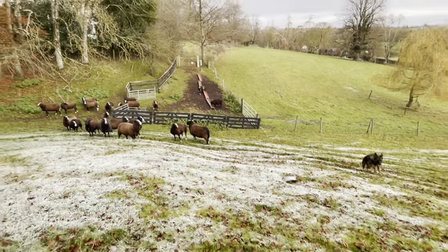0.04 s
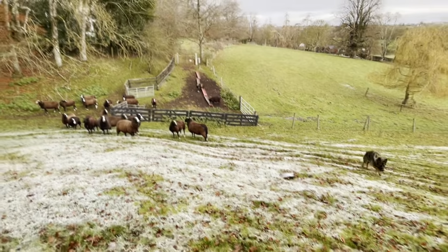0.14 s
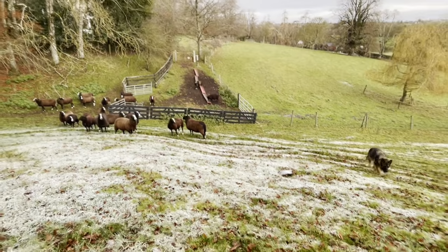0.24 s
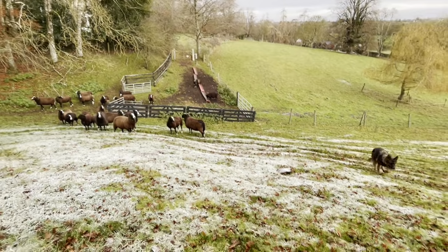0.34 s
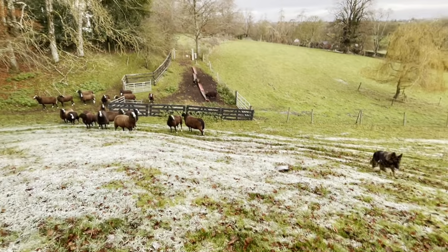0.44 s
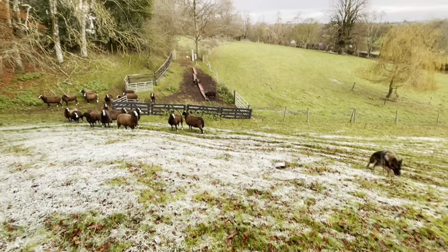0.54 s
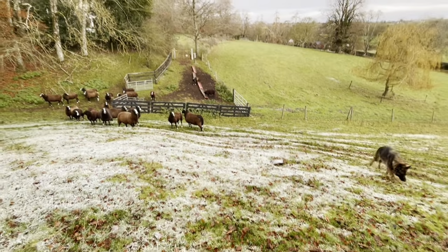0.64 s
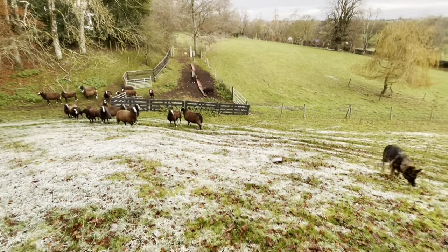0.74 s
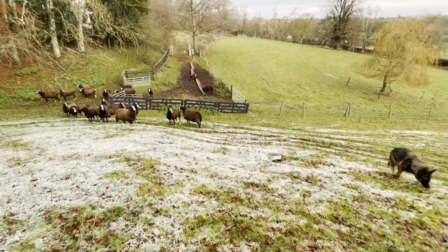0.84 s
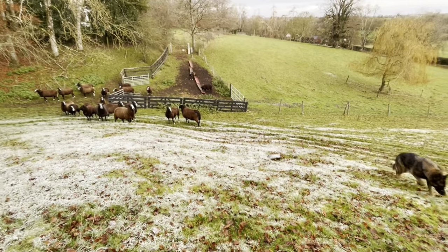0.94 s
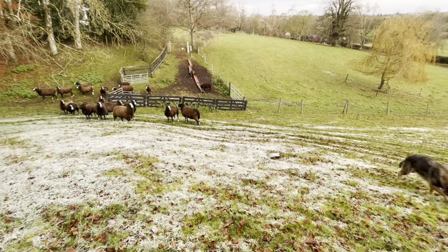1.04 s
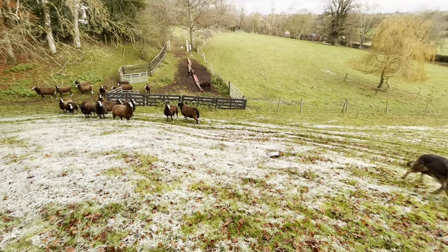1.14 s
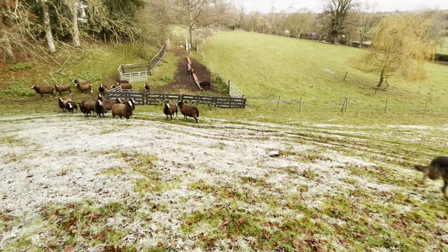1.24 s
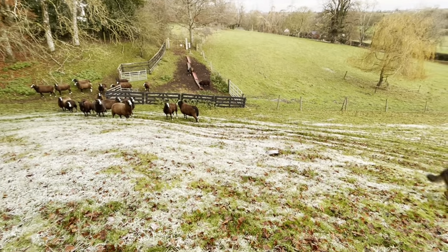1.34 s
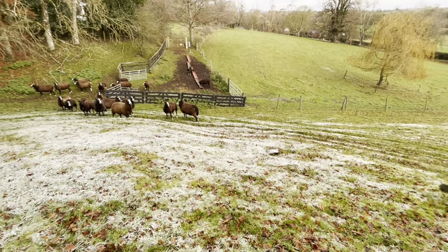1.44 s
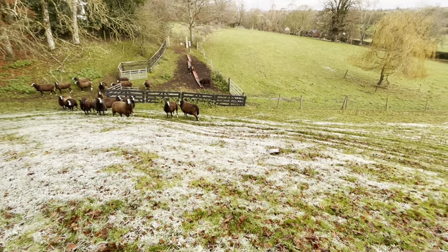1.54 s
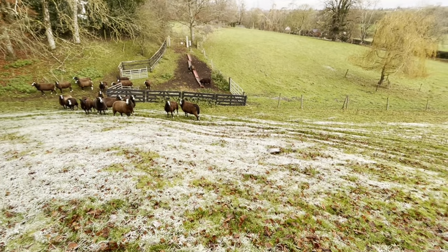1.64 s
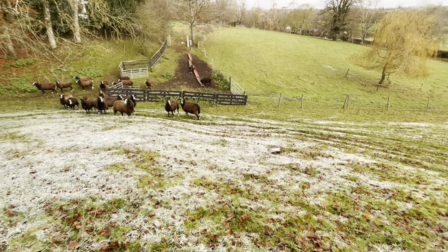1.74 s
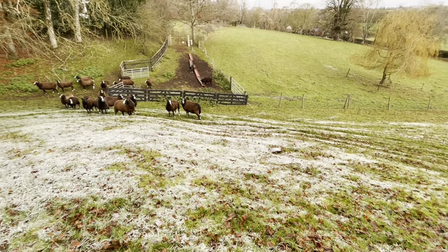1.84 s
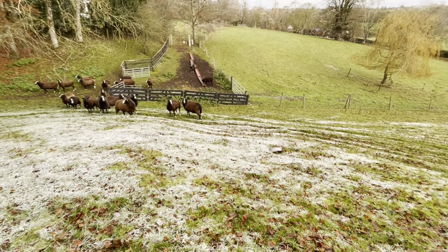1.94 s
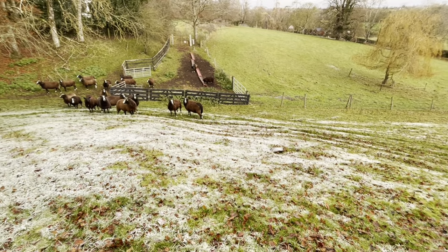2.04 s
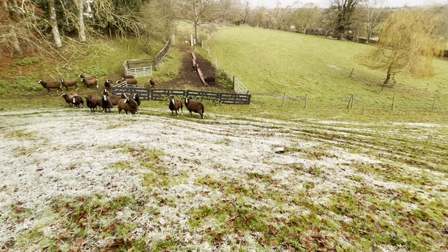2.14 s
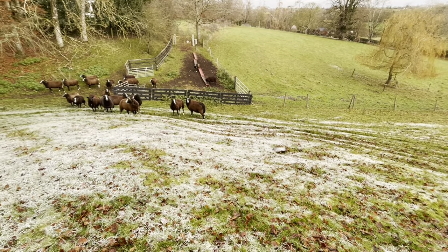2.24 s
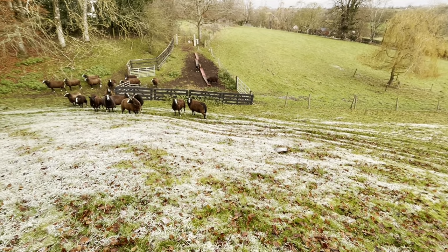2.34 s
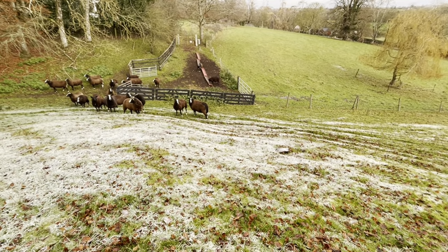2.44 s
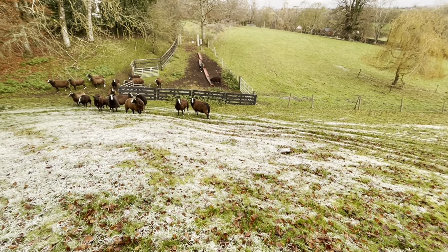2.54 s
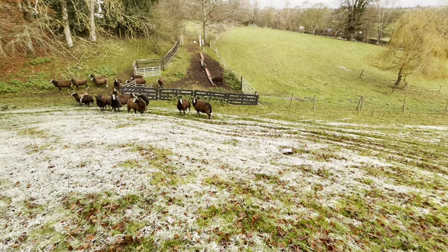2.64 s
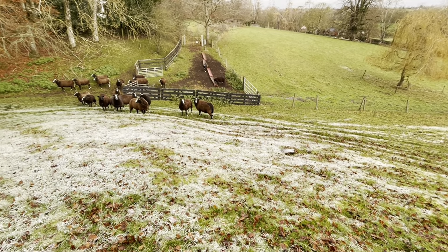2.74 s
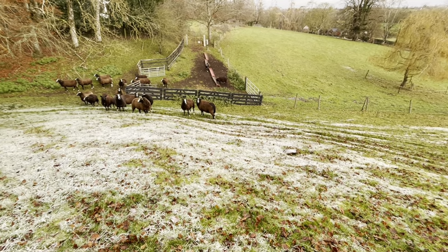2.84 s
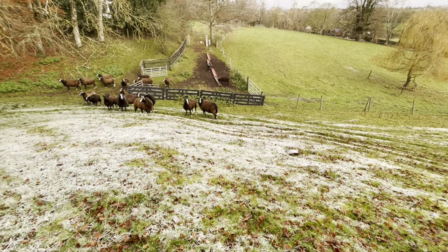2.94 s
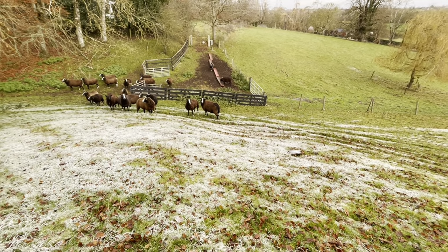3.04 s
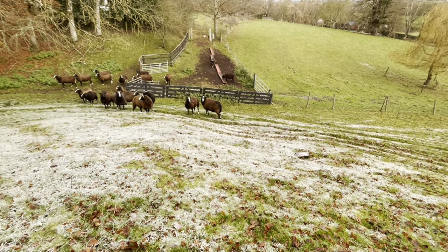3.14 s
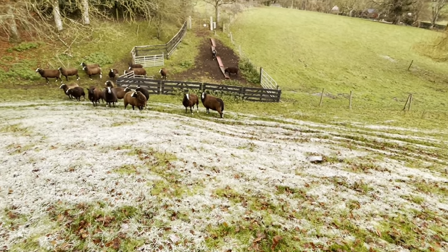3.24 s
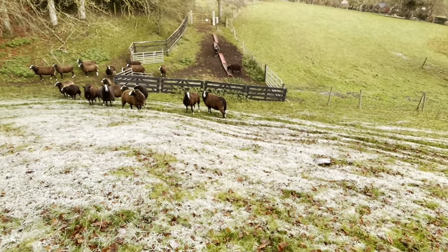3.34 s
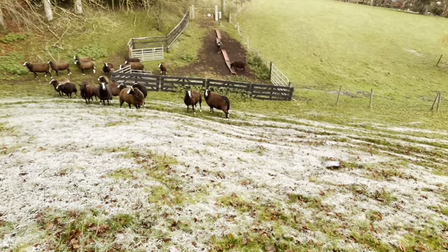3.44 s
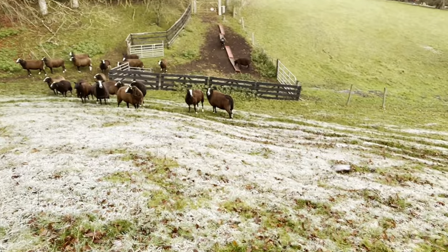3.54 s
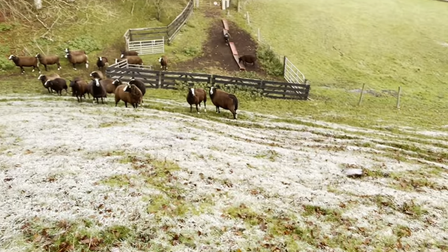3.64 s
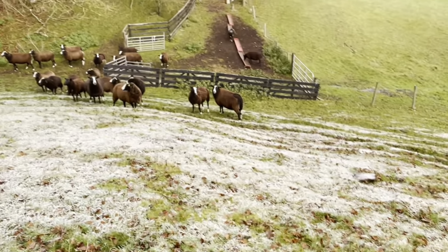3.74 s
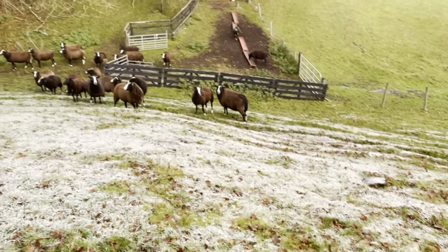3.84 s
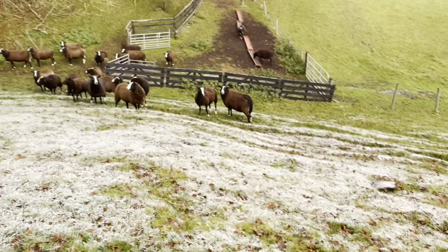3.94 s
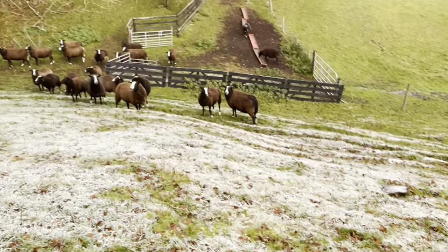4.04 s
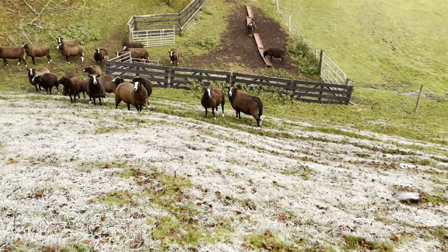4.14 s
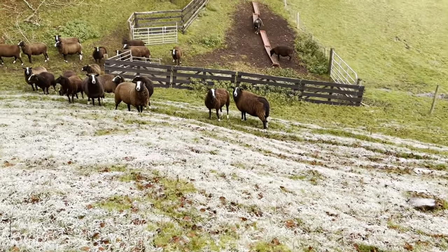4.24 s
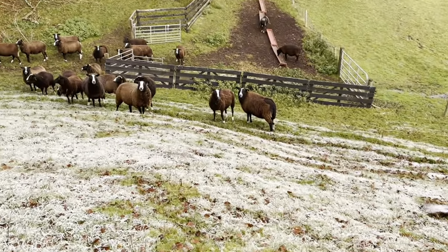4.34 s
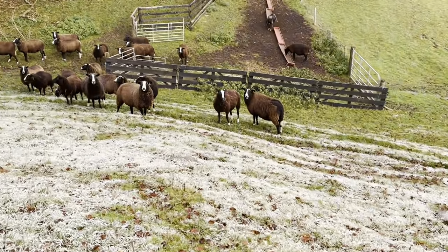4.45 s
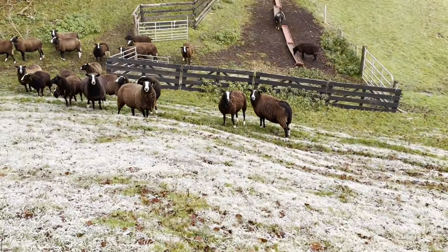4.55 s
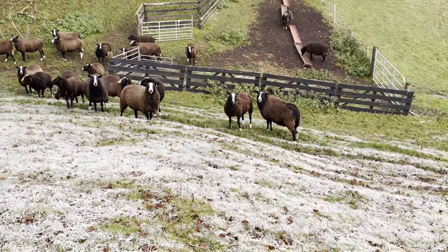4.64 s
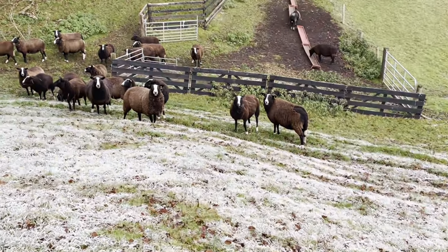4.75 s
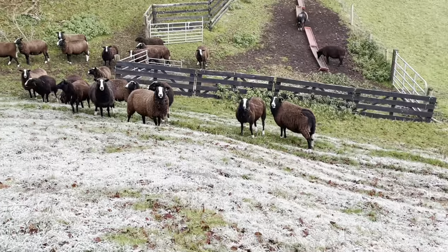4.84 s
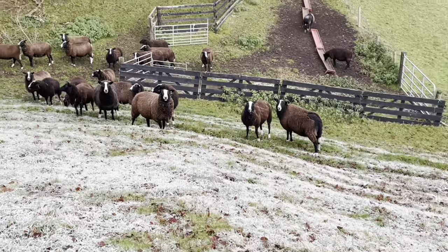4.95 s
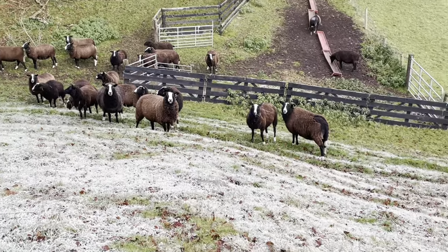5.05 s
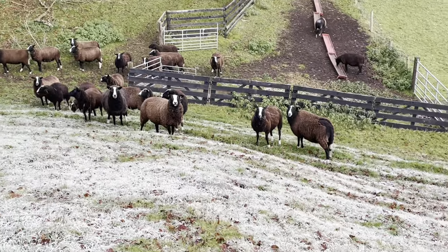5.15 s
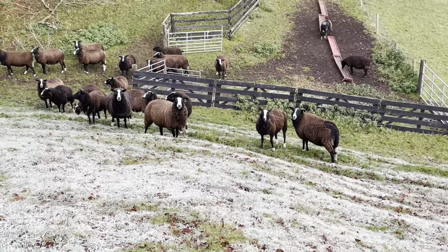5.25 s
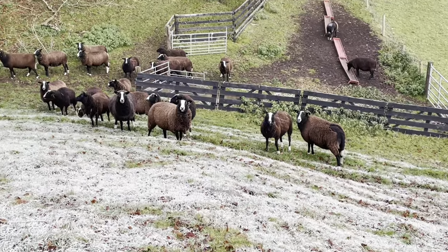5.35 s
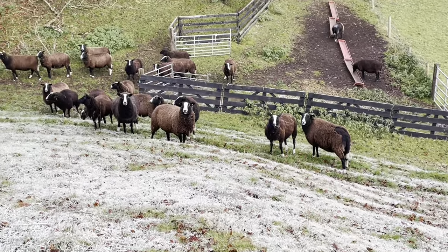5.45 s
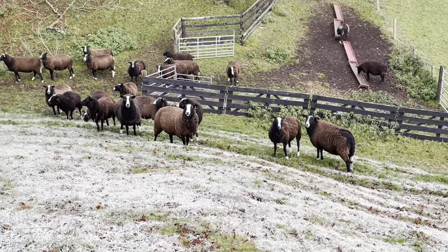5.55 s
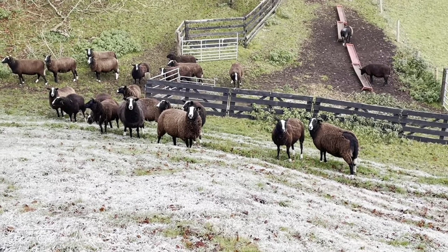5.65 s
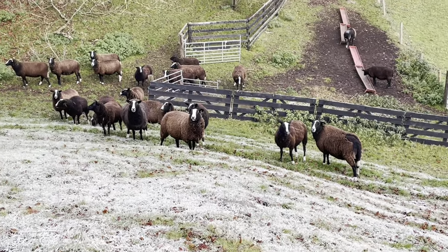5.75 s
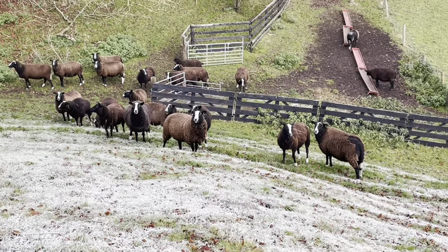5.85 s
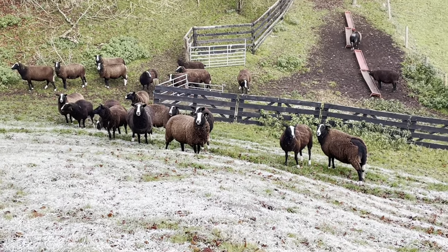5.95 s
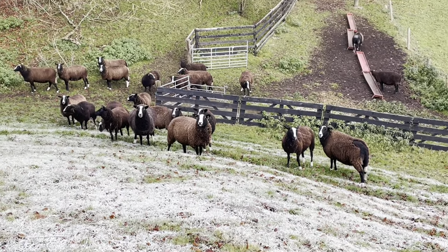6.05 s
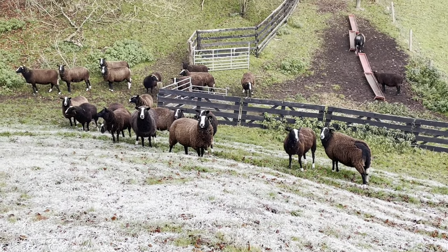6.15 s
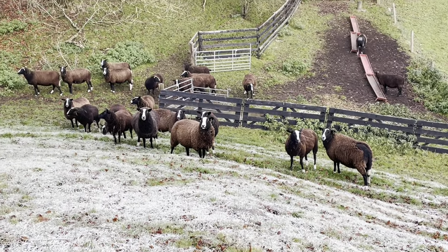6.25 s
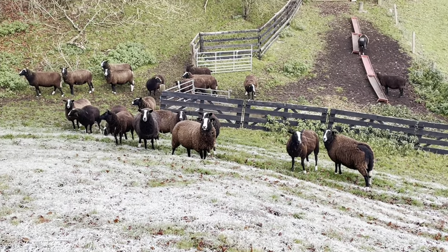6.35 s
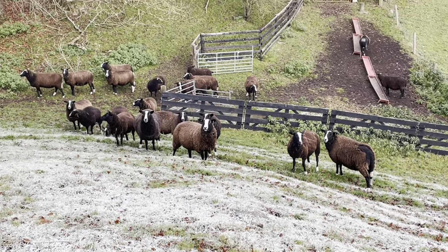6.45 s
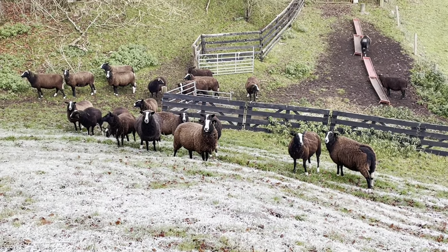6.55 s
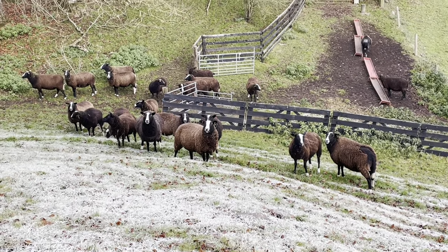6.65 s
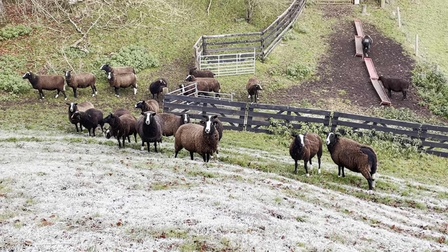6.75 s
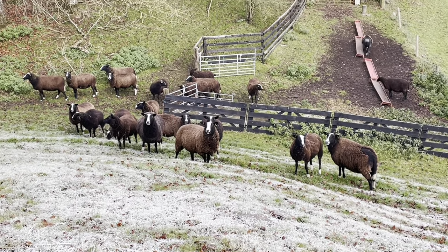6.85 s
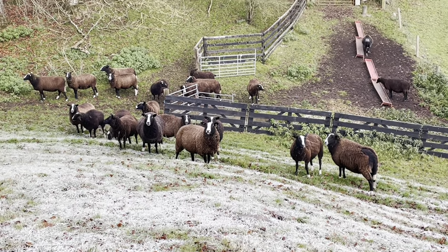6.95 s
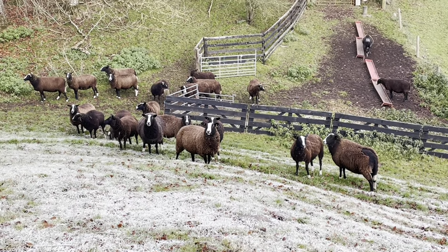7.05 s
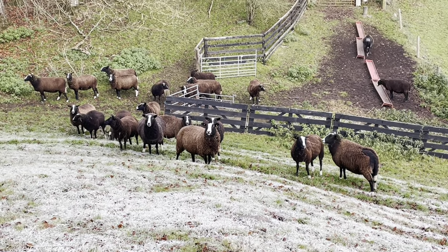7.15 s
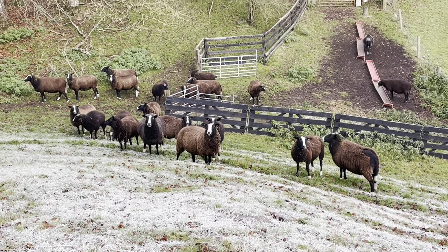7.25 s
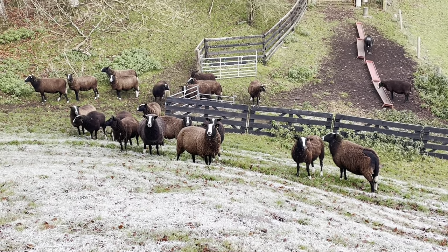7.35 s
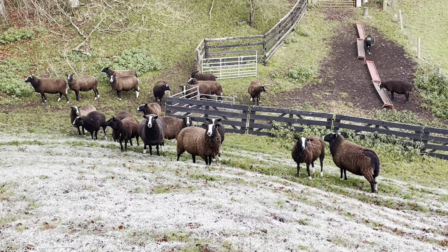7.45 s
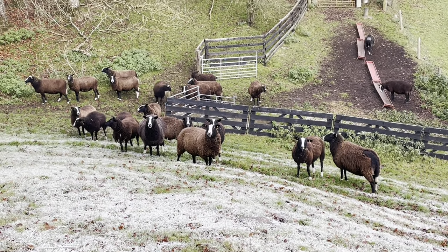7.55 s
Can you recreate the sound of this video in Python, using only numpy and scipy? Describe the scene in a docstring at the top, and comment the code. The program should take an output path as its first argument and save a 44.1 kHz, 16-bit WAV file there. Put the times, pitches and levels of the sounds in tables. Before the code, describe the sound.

A wide, open field with low wind rumble, soft airy wash and a distant, low engine drone fluttering about six times a second, growing stronger after 3 seconds. From 0.1 s a dog's paws patter lightly on frosty grass, each a brittle crush of tiny crackles. A mild gust swells around 1.1 s. The crunches become close and strongest at 1.6-2.5 s, with sharp stalk snaps and leg brushing, then dull and thin behind the camera, ending near 3.4 s. Short finger rubs on the camera occur around 1.3, 1.9 and 2.8 s. A faint side whistle sounds at 2.1 s. Tiny bird chirps follow, with a faint buzzing note at 4.3 s and clearer falling whistles at 4.6 and 5.3 s, lightly echoed by trees. A soft close rustle and dry ticks come at 5.1-5.9 s; then wind, engine drone and slightly rising tree hiss remain until 7.6 s.

```python
"""Dog on frosty grass

A dog trots past on the right over frosty grass and stops behind the camera; every paw crushes frozen blades,
made of tiny random fractures, ringing blades and snapping stalks. Two far engines, sums of firing orders,
beat against each other under wind rumble and the wash of open country, all drifting coloured noise.
A small bird's gliding tones echo from the wood edge and a second bird whistles once from the side.
Fluttering grains rustle softly close by, and fingers slip on the camera as gliding bands of noise."""
import sys
import numpy as np
from scipy import signal
from scipy.fft import rfft, irfft, next_fast_len
from scipy.io import wavfile
from scipy.ndimage import uniform_filter1d, map_coordinates

SR = 44100
rng = np.random.default_rng(int(sys.argv[2]) if len(sys.argv) > 2 else 0)


def store_pcm(level_fs):
    """Save levels as 16-bit WAV."""
    pcm = np.round(np.clip(level_fs, -1, 1) * 32767).astype(np.int16)
    wavfile.write(sys.argv[1], SR, np.atleast_2d(pcm).T)


N = 335292


def amp(db):
    """Decibels to gain."""
    return 10 ** (np.asarray(db) / 20)


def unit(x):
    """Scaled to rms 1."""
    return x / np.sqrt(np.mean(x ** 2) + 1e-20)


def along(points, hz):
    """(Hz, value) points read on a log frequency axis."""
    f, v = np.transpose(points)
    return np.interp(np.log(hz + 1), np.log(f + 1), v)


def curves(rows):
    """One value per sample for each column after the time."""
    s, *cols = np.transpose(rows)
    return [np.interp(np.arange(N) / SR, s, c) for c in cols]


def wobble(rate):
    """A smooth random curve, rate knots a second."""
    knots = rng.standard_normal(int(N * rate / SR) + 4)
    return map_coordinates(knots, [np.arange(N) * rate / SR])


def coloured(x, points):
    """x through a causal minimum-phase filter with the gain of the (Hz, dB) points."""
    m = 2 * next_fast_len(N // 2 + 8192)
    gain = amp(along(points, np.fft.rfftfreq(m, 1 / SR)))
    cepstrum = irfft(np.log(gain))
    # folding the cepstrum onto positive times makes the filter causal
    fold = 1 + np.sign(m // 2 - np.arange(m))
    fold[0] = 1
    response = np.exp(rfft(cepstrum * fold))
    return irfft(rfft(x, m) * response, m)[..., :N]


def add(track, s, sound):
    """Mix a sound into a track at time s."""
    part = track[..., max(round(s * SR), 0):][..., :sound.shape[-1]]
    part += sound[..., :part.shape[-1]]


def patchy(x, depth_db, size):
    """x with random gain patches; a longer frame makes them narrower in frequency and slower."""
    z = signal.stft(x, nperseg=size)[2]
    field = rng.standard_normal(z.shape[1:])
    field = uniform_filter1d(field, size=3, axis=0)  # over frequency
    field = uniform_filter1d(field, size=6, axis=1)  # over time
    return signal.istft(z * amp(depth_db * unit(field)), nperseg=size)[1][:, :N]


def strokes(rows):
    """Pressure of each (start_s, length_s, level_db) stroke: quick loading, slower release."""
    press = np.zeros(N)
    for s, length, db in rows:
        u = np.linspace(0, 1, max(int(length * SR), 2))
        add(press, s, amp(db) * np.abs(np.sin(np.pi * u ** .75)) ** 1.2)
    return press


def grains(rate, spread_db, scatter_s):
    """Tiny fractures of uneven size at rms 1; each reaches the left port early or late by its own delay."""
    draws = rng.random((int(rate * N / SR), 4))
    rarity = np.minimum(-np.log(1 - draws[:, 1]), 4)  # exponential: most are small, a few large
    size = amp(spread_db * rarity) * np.sign(draws[:, 2] - .5)
    right = draws[:, 0] * N
    left = right + SR * scatter_s * (2 * draws[:, 3] - 1)
    return unit(np.array([np.bincount(at.astype(int) % N, size, N) for at in (left, right)]))


def crack(t60, shape, hz=1):
    """One dry crack at peak 1: a random-sign burst, decaying over a fainter tail, coloured by its resonance."""
    t = np.arange(SR // 20) / SR
    decay = amp(-60 * t / max(t60, .002)) + amp(-30 - 60 * t / 0.1)
    burst = rng.choice([-1, 1], len(t)) * decay
    burst[:int(.0007 * SR)] *= 2.2  # harder at the moment of breaking
    f = np.fft.rfftfreq(len(t), 1 / SR)
    gain = amp(along([(k * hz, db) for k, db in shape], f))
    # the filter rings both ways in time, so the burst starts a few samples late
    rung = irfft(rfft(np.roll(burst, 16)) * gain, len(t))
    return rung / np.abs(rung).max()


# Stereo width of the air noise, fairly wide in the lows and mids, narrow near 4.4 kHz, widest at the top:
# pitch_hz [Hz], side_gain_db [dB]
AIR_SPREAD = [(60, -2), (150, -8), (380, -2.5), (700, -1.5), (1300, -3), (2400, -5), (4400, -29.5),
              (8000, 9.5)]


def rush(spectrum, side_db, patchy_db):
    """Stereo noise with drifting patches of gain; its middle and unspread side share an rms of 1."""
    noise = patchy(rng.standard_normal((2, N)), patchy_db, size=2048)
    mid, side = unit(coloured(noise, spectrum))
    side = amp(side_db) * coloured(side, AIR_SPREAD)
    return np.array([mid + side, mid - side])


def engine(firing_hz, orders, drift_hz, fade_db):
    """Low firing orders of a far engine, each fading on its own way through the air."""
    rate_hz = firing_hz + drift_hz * wobble(3)
    phase = 2 * np.pi * (np.cumsum(rate_hz) / SR + rng.random())
    return np.sqrt(2) * sum(amp(db + fade_db * wobble(5.5)) * np.sin(k * phase) for k, db in orders)


# Shared level of both far engines, growing overall: time_s [s], level_db [dB]
ENGINES_LEVEL = [(0, -50), (2.3, -46.5), (3, -44), (3.5, -46), (4.2, -42), (5.6, -42.5), (6.6, -42),
                 (7.6, -42.5)]
# Firing orders of the nearer engine: multiple [of its firing rate], level_db [dB, relative]
NEARER_ORDERS = [(1, -0.5), (3, -23), (4, -32), (5, -31.5), (5.5, -29), (7.5, -34)]
# Firing orders of the second engine: multiple [of its firing rate], level_db [dB, relative]
SECOND_ORDERS = [(1, -13.5), (2, -11.5)]
# Third order of the second engine, swelling and fading on the way: time_s [s], level_db [dB]
SECOND_THIRD_LEVEL = [(0, -65), (.6, -58), (1.5, -63.5), (2.3, -67.5), (2.9, -56.5), (3.6, -65),
                      (4.4, -54.5), (5, -61), (6.2, -63), (6.95, -52.5), (7.2, -64.5)]
# Exhaust noise of the nearer engine: pitch_hz [Hz], density_db [dB per Hz, relative]
EXHAUST_SPECTRUM = [(200, -24), (330, 8), (420, 16), (560, 5), (800, -42.5)]
NEARER_HZ, SECOND_HZ = 78.4, 42.37  # mean firing rates [Hz]
EXHAUST_DB = -23.5  # mean level relative to the drone [dB]


def engines():
    """The second order of one engine beats against the first of the other, about six times a second."""
    level_db, = curves(ENGINES_LEVEL)
    third_db, = curves(SECOND_THIRD_LEVEL)
    nearer = engine(NEARER_HZ, NEARER_ORDERS, drift_hz=0.14, fade_db=1.5)
    second = engine(SECOND_HZ, SECOND_ORDERS, drift_hz=0.48, fade_db=4.5)
    third = engine(SECOND_HZ, [(3, 0.0065)], drift_hz=0.43, fade_db=3.0)
    exhaust = rush(EXHAUST_SPECTRUM, side_db=-8.0, patchy_db=2.5)
    exhaust = amp(EXHAUST_DB + 2.3 * wobble(8)) * exhaust
    return amp(level_db) * (nearer + second + exhaust) + amp(third_db) * third


# Spectra of the moving air, each: pitch_hz [Hz], density_db [dB per Hz, relative]
RUMBLE_SPECTRUM = [(20, -39.5), (31, -16), (37, -14), (45, -4), (58, 2), (68, 3.5), (83, 7), (97, -3.5),
                   (125, -8), (150, -10.5), (185, -16), (224, -8), (255, -16), (400, -67.5)]  # low wind
WASH_SPECTRUM = [(120, -23), (280, -0.5), (420, 0), (600, -0.5), (730, -3), (870, 1.5), (1060, -1),
                 (1220, -7.5), (1430, -3), (1700, -9), (2200, -15), (3500, -79)]  # open country
TREES_SPECTRUM = [(1300, -28), (1900, 5), (2400, 3), (3000, -3), (3500, -8.5), (4300, -14), (5200, -22.5),
                  (7000, -28.5), (12000, -65), (15500, -46)]
GUST_RUSH_SPECTRUM = [(1100, -30), (1380, -3), (1540, 0), (1700, -9), (2100, -30)]  # rush that rises with the gust
AROUND_SPECTRUM = [(1200, -21.5), (2500, -1), (3400, -4), (4600, -2), (7000, -13), (14000, -33.5)]  # thin hiss from all around
# Width of the air, narrowing as the camera zooms in: time_s [s], side_db [dB, before each layer's offset]
AIR_WIDTH = [(3.5, -5.5), (4.5, -8.5)]
# Wash of open country before the gust lifts it: time_s [s], level_db [dB]
WASH_LEVEL = [(0, -60), (1.1, -60), (2.6, -57.5), (4.5, -60.5), (7.6, -58.5)]
# Hiss of the trees before the gust lifts it: time_s [s], level_db [dB]
TREES_LEVEL = [(0, -72.5), (3.4, -72), (5, -68.5), (6.7, -67.5), (7.6, -63.5)]
# Hiss from all around, shut out as the camera zooms in: time_s [s], level_db [dB]
AROUND_LEVEL = [(0, -72), (.6, -75), (1.2, -70), (2.6, -76), (3.9, -82.5), (4.5, -100)]
GUST_S, GUST_WIDTH_S = 1.1, 0.35  # centre and half-width of the one gust [s]
WIND_DB, WIND_DB_PER_S = -53, 0.67  # starting level of the rumble [dB] and its slow rise [dB/s]


def air():
    """Noise shaped as low wind rumble, the broad wash of open country and faint hisses, with one gust."""
    t = np.arange(N) / SR
    wash_db, = curves(WASH_LEVEL)
    trees_db, = curves(TREES_LEVEL)
    around_db, = curves(AROUND_LEVEL)
    side_db, = curves(AIR_WIDTH)
    gust = np.exp(-((t - GUST_S) / GUST_WIDTH_S) ** 2)
    rumble = amp(WIND_DB + WIND_DB_PER_S * t) * rush(RUMBLE_SPECTRUM, side_db + 1.0, patchy_db=2.0)
    wash_db = wash_db + 2.3 * gust + 0.21 * wobble(12)
    wash = amp(wash_db) * rush(WASH_SPECTRUM, side_db + 4.0, patchy_db=2)
    trees_db = trees_db + 6 * gust + 0.45 * wobble(7)
    trees = amp(trees_db) * rush(TREES_SPECTRUM, side_db + 0.5, patchy_db=3.0)
    gust_rush = amp(-66) * gust * rush(GUST_RUSH_SPECTRUM, side_db, patchy_db=5.0)
    around = amp(around_db) * unit(coloured(rng.standard_normal((2, N)), AROUND_SPECTRUM))
    return rumble + wash + trees + gust_rush + around


# Range of pitches at which single blades break: lowest_hz, highest_hz [Hz]
BLADE_RANGE = (1800, 14000)
BLADE_Q, BLADES_PER_S = 6, 420  # sharpness of the ring; breaks a second at each pitch


def blades():
    """Single frozen blades breaking, each with a brief ring at one of 14 pitches; rms 1."""
    total = np.zeros((2, N))
    for hz in np.geomspace(*BLADE_RANGE, 14):
        breaks = grains(rate=BLADES_PER_S, spread_db=3.2, scatter_s=.00003)
        total += signal.lfilter(*signal.iirpeak(hz, BLADE_Q, SR), breaks)
    return unit(total)


# Stiff stalks snapping: start_s [s], peak_db [dB, before microphone and port gains], pitch_hz [Hz]
STALK_SNAPS = [(0.171, -44, 6000), (0.333, -50, 7000), (0.4245, -36, 11500), (0.426, -40.5, 5500),
               (0.7022, -47.5, 10000), (1.028, -54, 11000), (1.078, -43, 9900), (1.1147, -36, 8000),
               (1.526, -44, 9800), (1.6088, -28.5, 8250), (1.648, -31, 6950), (1.7135, -42, 7500),
               (1.7875, -39.5, 7000), (1.7945, -42, 7000), (1.8046, -31.5, 8400), (1.8093, -30, 7660),
               (1.838, -39, 6600), (1.983, -45, 9500), (2.058, -41.5, 6660), (2.2466, -39, 5700),
               (2.2472, -38, 2690), (2.3126, -39, 7800), (2.3832, -41, 6000), (2.397, -37.5, 8600),
               (2.625, -52, 7950), (2.871, -45.5, 8600), (2.8965, -49.5, 9100), (2.937, -49, 9300),
               (3.51, -51, 8800)]
# Spectrum of a snap: multiple [of its pitch], gain_db [dB, relative]
SNAP_SPECTRUM = [(.15, -16), (.45, -20), (.75, -2.5), (1, 3.5), (1.25, -7), (1.7, -16), (2.5, -31)]
# Treble roll-off of the microphone: pitch_hz [Hz], gain_db [dB]
MIC_ROLL_OFF = [(12000, 0), (13500, -3), (15000, -14)]


def stalk_snaps():
    """Stiff stalks break under the paws, each a short burst around its own pitch."""
    snaps = np.zeros(N)
    for s, db, hz in STALK_SNAPS:
        add(snaps, s, amp(db) * crack(t60=0.009, shape=SNAP_SPECTRUM, hz=hz))
    return coloured(snaps, MIC_ROLL_OFF)


def frost_crunch():
    """A dense crush of fine blades, with coarser ones cracking through it; rms 1."""
    fine = grains(rate=16000, spread_db=3, scatter_s=.00005)
    crush = .75 * fine + blades()
    return unit(patchy(crush * amp(1.5 * wobble(260)), depth_db=2.5, size=512))


# Paw falls: start_s [s], length_s [s], crunch_db [dB, before STEP_DB], swish_db [dB, soft blades]
PAW_FALLS = [(0.108, 0.14, -65.5, -65), (0.237, 0.097, -75, -64.5), (0.333, 0.023, -59, -61.5),
             (0.349, 0.029, -59.5, -55), (0.604, 0.061, -61.5, -60), (0.637, 0.057, -60, -57),
             (0.8, 0.053, -60, -59), (0.897, 0.062, -58, -61), (1.074, 0.081, -57.5, -82),
             (1.342, 0.12, -63.5, -68), (1.62, 0.11, -54.5, -65.5), (1.783, 0.035, -51.5, -66),
             (1.83, 0.026, -56.5, -72), (1.855, 0.13, -48.5, -59), (2.148, 0.093, -47.5, -66),
             (2.322, 0.1, -53, -69), (2.423, 0.083, -53, -70), (2.686, 0.15, -56, -81.5),
             (2.84, 0.12, -69, -77), (3.041, 0.092, -59.5, -72), (3.313, 0.085, -64.5, -76)]
# Legs brushing the grass: time_s [s], level_db [dB, before a fixed lift]
LEG_BRUSH = [(0, -75), (.2, -71), (.5, -75.5), (.95, -73), (1.25, -71), (2.0, -64.5), (2.42, -56.5),
             (2.62, -68), (3.4, -76), (4.1, -79), (4.4, -110)]
# Dull knocks and scrapes on the stiff turf: start_s [s], length_s [s], level_db [dB]
TURF_SCUFFS = [(1.645, 0.025, -63), (1.875, 0.12, -62.5), (2.745, 0.075, -62.5), (4.79, .06, -65)]
# Colour of breaking frost: pitch_hz [Hz], gain_db [dB]
FROST_COLOUR = [(300, -12), (1200, -15), (2300, -3), (3200, -7), (4200, 1), (5400, -3), (6500, -2),
                (7500, 3.5), (8500, -12), (10500, -5), (13000, -5), (15500, -28.5)]
# Colour of soft blades sweeping past a paw: pitch_hz [Hz], gain_db [dB, relative]
SWISH_COLOUR = [(1500, -18), (2800, -12), (3800, 0), (5500, 2.5), (7000, -10), (10000, -23)]
# Colour of the turf: pitch_hz [Hz], gain_db [dB, relative]
TURF_COLOUR = [(200, 3), (500, 0), (900, -10), (1500, 10), (2300, 13.5), (2900, 10), (3800, -6),
               (7000, -23), (14000, -28)]
# Shade of the camera body: pitch_hz [Hz], gain_db [dB]
BEHIND_CAMERA = [(1000, 8.5), (3500, -8.5), (5500, -7), (7500, -12), (10000, -5.5), (13000, -31),
                 (15500, -24.5)]
# Bright ring of the microphone port that faces the frost: pitch_hz [Hz], gain_db [dB]
PORT_COLOUR = [(6500, -40.5), (7700, -35), (8400, -2.5), (9300, 2), (10200, -4), (11200, -26.5),
               (12500, -35.5)]
# Strength of that ring at the right port: time_s [s], gain_db [dB]
PORT_RING_LEVEL = [(.95, 1), (1.25, 7), (2.2, -2), (3.1, 7.5), (3.5, 2.5), (3.75, -16)]
# Snaps at the left port, fading as the dog goes round: time_s [s], gain_db [dB, before SNAP_DB]
SNAP_LEFT_LEVEL = [(2.3, -3), (2.9, -9)]
# Left port behind the right as the dog circles round: time_s [s], delay_s [s]
PORT_LAG = [(.8, .0001), (1.5, .00034), (2.4, .00036), (2.9, -.00016)]
PASS_S, PASS_TIME_S = 1.85, 0.5  # the dog slips behind the camera body: when, and how gradually [s]
STEP_DB, SCUFF_DB = 3.5, -28  # a paw's crunch, and its scuff on the turf, relative to its level [dB]
SPRING_BACK_S, SPRING_BACK_DB = 0.13, -12  # bent blades crackle on as the paw lifts [s, dB]
SNAP_DB, SNAP_PORT_DB = -2.5, 2.5  # base gain of direct snaps; how hard they ring the port [dB]


def paws():
    """Each paw presses down frozen blades; the frost dulls as the dog slips behind the camera."""
    t = np.arange(N) / SR
    brush_db, = curves(LEG_BRUSH)
    port_db, = curves(PORT_RING_LEVEL)
    snap_left_db, = curves(SNAP_LEFT_LEVEL)
    lag_s, = curves(PORT_LAG)
    shaded = 1 / (1 + np.exp((PASS_S - t) / PASS_TIME_S))
    snaps = stalk_snaps()
    crunch = frost_crunch()

    press = strokes([(s, length, db) for s, length, db, _ in PAW_FALLS])
    sweep = strokes([(s, length, db) for s, length, _, db in PAW_FALLS])
    keep = np.exp(-1 / (SPRING_BACK_S * SR))
    spring_back = amp(SPRING_BACK_DB) * signal.lfilter([1 - keep], [1, -keep], press)
    catching = amp(2.5 * wobble(45))  # the legs catch the grass unevenly
    brushing = amp(brush_db + 3.5) * catching
    frost = crunch * np.hypot(amp(STEP_DB) * (press + spring_back), brushing)

    direct = coloured(frost, FROST_COLOUR) * amp([[-1], [1]])  # left and right gain, dB
    behind = coloured(direct, BEHIND_CAMERA)
    swish = unit(coloured(blades(), SWISH_COLOUR)) * sweep
    left, right = (1 - shaded) * direct + shaded * behind + swish
    left = left + amp(SNAP_DB + snap_left_db) * snaps
    left = map_coordinates(left, [(t - lag_s) * SR], order=5)
    port_ring = coloured(frost[0] + amp(SNAP_PORT_DB) * snaps, PORT_COLOUR)
    right = right + amp(SNAP_DB + 4.5) * snaps + amp(port_db) * port_ring

    turf = crunch[1] + amp(-4.0) * rng.standard_normal((2, N))
    scuff_press = strokes(TURF_SCUFFS) + amp(SCUFF_DB) * press
    scuffs = unit(coloured(turf, TURF_COLOUR)) * scuff_press
    return np.array([left, right]) + scuffs


# Fingers slipping on the camera case:
# start_s [s], length_s [s], first_hz [Hz], last_hz [Hz], level_db [dB, before the port gains]
FINGER_RUBS = [(1.321, 0.089, 650, 1314, -53), (1.346, 0.065, 1600, 2410, -56),
               (1.855, 0.14, 850, 1315, -47), (2.76, 0.033, 650, 700, -55), (2.92, 0.031, 300, 90, -50)]
RUB_KNOTS_PER_S = 600  # sets the width of the rubbing band


def handling():
    """Each slip hisses in a narrow gliding band; the case flexes, so the ports move in opposite directions."""
    case = np.zeros(N)
    for s, length, first_hz, last_hz, db in FINGER_RUBS:
        hz, = curves([(s, first_hz), (s + length, last_hz)])
        phase = 2 * np.pi * np.cumsum(hz) / SR
        band = wobble(RUB_KNOTS_PER_S) * np.sin(phase) + wobble(RUB_KNOTS_PER_S) * np.cos(phase)
        case += unit(band) * strokes([(s, length, db)])
    return case * np.array([[-.8], [1]])


GLIDE_BEND, SWELL = 1.4, 1.34  # notes settle on their last pitch, and are loudest past their middle
BUZZ_DEPTH_HZ, WHISTLE_DEPTH_HZ = 297, 50  # depth of the pitch flutter [Hz]
FLUTTER_HZ = 110  # rate of its regular part [Hz]


def note(length, first_hz, last_hz, db, depth_hz, arched=False):
    """One gliding tone; an arched one eases into its glide, and a deep pitch flutter roughens it."""
    u = np.linspace(0, 1, max(int(length * SR), 2))
    flutter = np.sin(2 * np.pi * FLUTTER_HZ * length * u) + .5 * wobble(460)[:len(u)]
    to_go = (1 + np.cos(np.pi * u)) / 2 if arched else 1 - u
    hz = last_hz + (first_hz - last_hz) * to_go ** GLIDE_BEND + depth_hz * flutter
    swell = np.abs(np.sin(np.pi * u ** SWELL)) ** (1 if arched else .5)
    swell = swell * signal.windows.tukey(len(u), .25)
    return amp(db + 0.4) * swell * np.sqrt(2) * np.sin(2 * np.pi * np.cumsum(hz) / SR)


# A second bird, far off to one side, slurring one whistle:
# start_s [s], length_s [s], first_hz [Hz], last_hz [Hz], level_db [dB, before note gain and flicker]
SIDE_WHISTLE = (2.075, .115, 3700, 3300, -69)
SIDE_LAG_S = .00013  # left port behind the right [s]


def side_bird():
    """The whistle from the side reaches the left port later than the right."""
    s, *shape = SIDE_WHISTLE
    call = note(*shape, WHISTLE_DEPTH_HZ)
    pair = np.zeros((2, N))
    add(pair[0], s + SIDE_LAG_S, call)
    add(pair[1], s, call)
    return pair * amp(2 * wobble(50))


# Short gliding and fluttering tones and falling whistles; each table holds:
# start_s [s], length_s [s], first_hz [Hz], last_hz [Hz], level_db [dB, before note gain and flicker]
SHORT_GLIDES = [(2.089, 0.027, 4500, 4410, -66.5), (2.858, 0.02, 5140, 5650, -71),
                (3.054, 0.024, 3450, 4340, -68.5), (3.248, 0.038, 5300, 5620, -74.5),
                (3.589, 0.013, 3570, 4230, -69), (3.648, 0.015, 4340, 4920, -75),
                (3.66, 0.013, 5000, 4450, -77), (3.753, 0.018, 4380, 4800, -78),
                (3.888, 0.017, 3700, 4230, -72), (4.852, 0.024, 4020, 5700, -61),
                (4.855, 0.022, 5250, 7200, -72), (5.229, 0.013, 3160, 3780, -61.5)]
FALLING_WHISTLES = [(4.563, 0.14, 6160, 4500, -63.5), (5.326, .152, 5680, 4440, -64)]  # they tip over and level out
FLUTTERING_TONES = [(4.25, 0.32, 6720, 6340, -76.5), (4.332, 0.11, 4500, 5280, -78),
                    (6.877, .06, 4170, 4320, -82)]
# all but the last row of two tables belong to the bird at the wood edge
CHIRPS, BUZZING_NOTES = SHORT_GLIDES[:-1], FLUTTERING_TONES[:-1]


def bird():
    """Scattered chirps, falling whistles and fluttering buzzes, all gliding sines of flickering level."""
    song = np.zeros(N)
    for s, *shape in CHIRPS:
        add(song, s, note(*shape, WHISTLE_DEPTH_HZ))
    for s, *shape in FALLING_WHISTLES:
        add(song, s, note(*shape, WHISTLE_DEPTH_HZ, arched=True))
    for s, *shape in BUZZING_NOTES:
        add(song, s, note(*shape, BUZZ_DEPTH_HZ))
    return song * amp(1.5 * wobble(70))


# Echo of the wood edge: pitch_hz [Hz], t60_s [s, time to fall by 60 dB]
WOOD_ECHO = [(500, 0.25), (3600, 0.57), (4800, 0.65), (9000, 0.25)]


def wood_edge(x):
    """Trunks scatter a sound into a diffuse tail, narrow because the wood is far away."""
    hz, t, z = signal.stft(rng.standard_normal((2, SR // 2)), SR, nperseg=256)
    decay = amp(-60 * t / along(WOOD_ECHO, hz)[:, None])
    mid, side = signal.istft(z * decay, SR, nperseg=256)[1]
    side = amp(-14) * side
    tail = np.array([mid + side, mid - side]) / np.linalg.norm(mid)
    return signal.fftconvolve(x[None], tail, axes=1)[:, :N]


# Strokes of the close rustle: start_s [s], length_s [s], level_db [dB]
RUSTLE_STROKES = [(5.09, 0.31, -72), (5.33, 0.31, -70), (5.715, 0.14, -73.5), (5.825, 0.12, -67.5)]
# Colour of the rustle: pitch_hz [Hz], gain_db [dB, relative]
RUSTLE_COLOUR = [(1500, -4), (3500, 7), (5500, 4), (7300, 1.5), (8200, -23), (9300, 3.5), (11000, 4.5),
                 (13500, 0.5), (15500, -17)]
# Small close ticks: start_s [s], peak_db [dB, before a fixed cut]
DRY_TICKS = [(3.98, -53), (4.2564, -51), (5.033, -51.5), (5.1054, -51), (5.231, -52), (5.546, -51),
             (5.901, -56)]
# Colour of a tick: pitch_hz [Hz], gain_db [dB, relative]
TICK_COLOUR = [(1000, -13), (3000, 0.5), (4300, 10.5), (6500, 0), (8200, -21), (10000, -10.5), (15000, -22)]


def rustle():
    """A soft rustle of fluttering grains right beside the camera, with a few dry ticks."""
    fibres = grains(rate=7000, spread_db=3.6, scatter_s=.00003)
    fibres = fibres * amp(1.6 * wobble(170) + 1.6 * wobble(45))
    fibres = patchy(fibres, depth_db=2, size=256)
    ticks = np.zeros(N)
    for s, db in DRY_TICKS:
        add(ticks, s, amp(db - 4.0) * crack(t60=0.05, shape=TICK_COLOUR))
    return unit(coloured(fibres, RUSTLE_COLOUR)) * strokes(RUSTLE_STROKES) + ticks


# A small close tick with a brief rising pitch, and a faint soft rustle near 4 kHz:
# start_s [s], length_s [s], first_hz [Hz], last_hz [Hz], level_db [dB, before note gain and flicker]
RISING_TICK, FAINT_RUSTLE = SHORT_GLIDES[-1], FLUTTERING_TONES[-1]


def tick_and_faint_rustle():
    """A very short rising sine makes the tick; a sine with a deep pitch flutter makes the faint rustle."""
    track = np.zeros(N)
    s, *shape = RISING_TICK
    add(track, s, note(*shape, WHISTLE_DEPTH_HZ))
    s, *shape = FAINT_RUSTLE
    add(track, s, note(*shape, BUZZ_DEPTH_HZ))
    return track * amp(1.5 * wobble(70))


def scene():
    """Everything in the field; the tones share one diffuse tail."""
    tones = bird() + tick_and_faint_rustle()
    echo = amp(-6 + 2 * wobble(90)) * wood_edge(tones)
    return engines() + air() + paws() + handling() + side_bird() + tones + echo + rustle()


TOP_HZ = 15780  # band limit of the camera [Hz]


def record(dry):
    """The camera keeps nothing above its band limit; the ends open and close softly."""
    m = next_fast_len(N + 8192)
    ends = signal.windows.tukey(N, .002)
    kept = np.fft.rfftfreq(m, 1 / SR) < TOP_HZ
    return irfft(rfft(dry * ends, m) * kept, m)[:, :N]


dry = scene()
out = record(dry)
store_pcm(out)
```